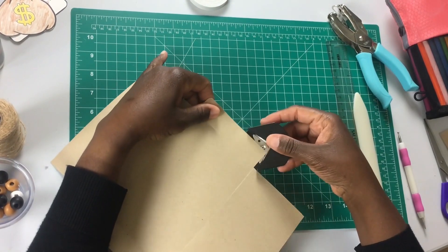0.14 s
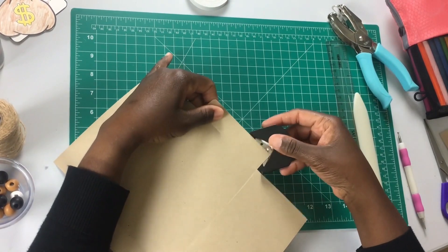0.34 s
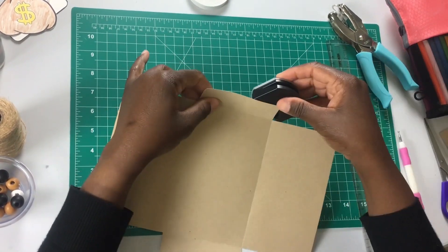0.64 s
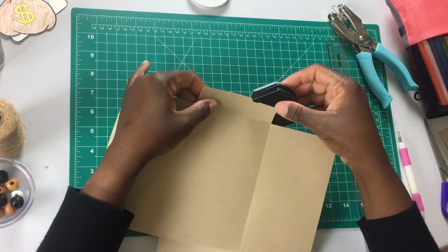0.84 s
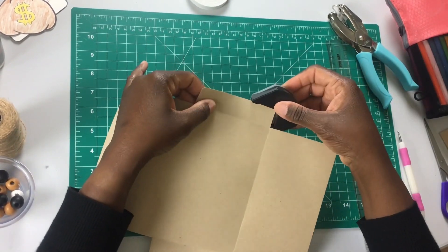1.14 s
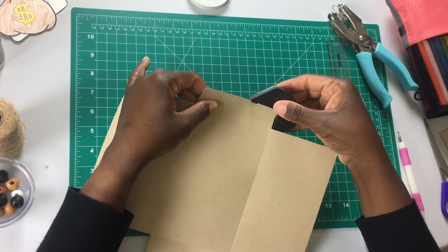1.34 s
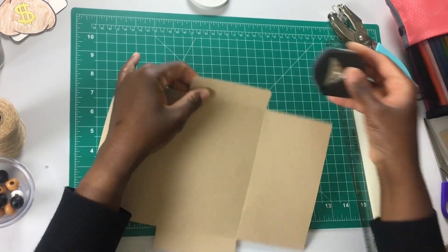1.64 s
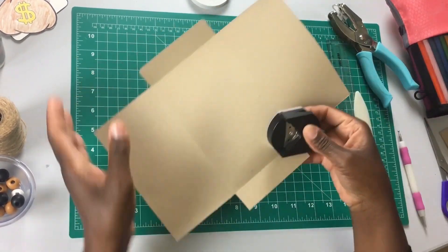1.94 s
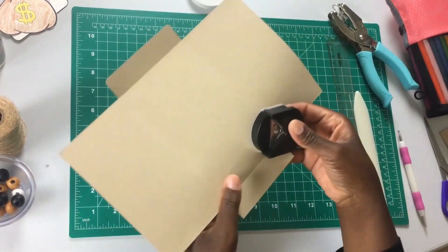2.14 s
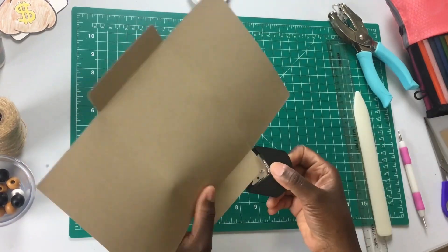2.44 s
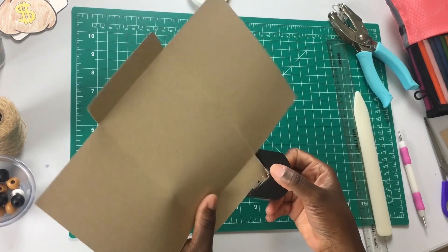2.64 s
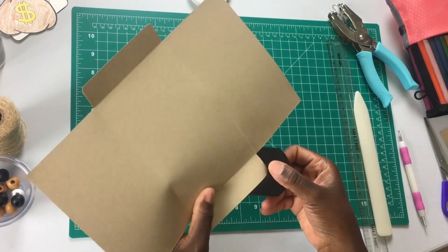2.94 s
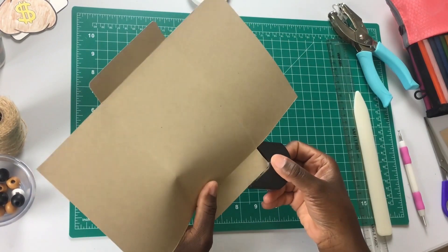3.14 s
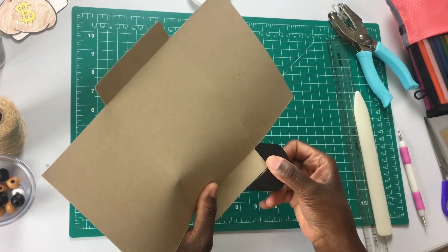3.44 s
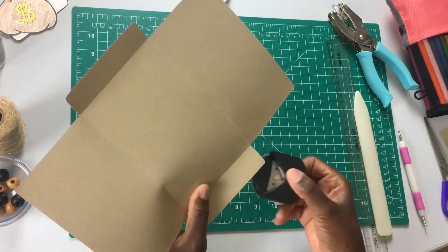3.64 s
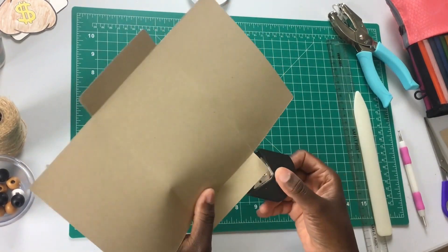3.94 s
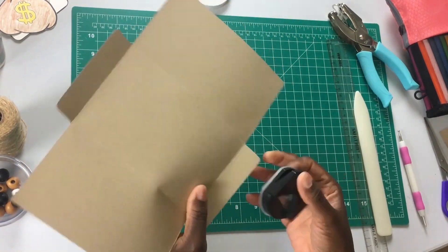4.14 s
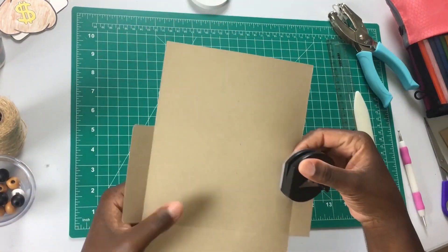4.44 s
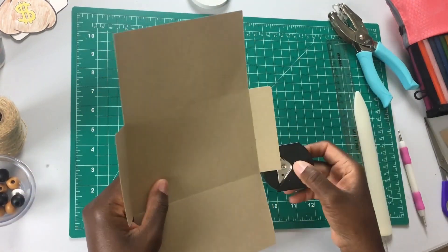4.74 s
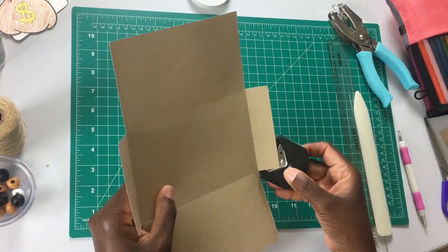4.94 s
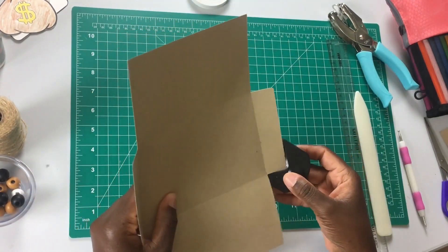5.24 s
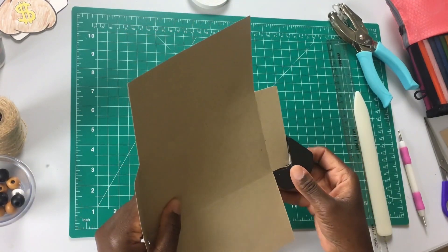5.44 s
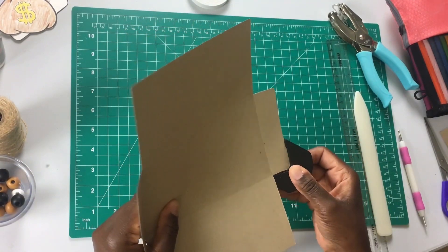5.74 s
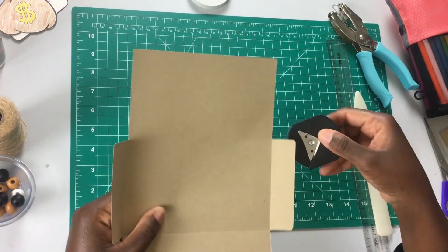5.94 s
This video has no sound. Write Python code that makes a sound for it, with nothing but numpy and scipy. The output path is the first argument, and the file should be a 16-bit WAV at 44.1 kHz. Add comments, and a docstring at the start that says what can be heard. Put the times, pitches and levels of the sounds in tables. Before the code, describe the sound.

A handheld corner punch crunches sharply through stiff card three times, with one weak tear, amid dry paper rustles and small knocks.

```python
"""Corner punch on a card folder

A handheld corner punch rounds three corners of a card folder over a cutting mat, close to a microphone. Each of
four cuts, the third weak, is a swell of tearing fibres, a crack and a short rattle of the housing; return
clicks follow the first, second and last. In between, filtered noise makes the card brush over mat and fingers,
and noise-driven modes make it knock and squeak, above a low room rumble and a thin hiss."""
import sys
import numpy as np
from scipy import signal
from scipy.fft import rfft, irfft, next_fast_len
from scipy.io import wavfile
from scipy.ndimage import uniform_filter1d

SR = 44100
rng = np.random.default_rng(int(sys.argv[2]) if len(sys.argv) > 2 else 0)


def generate_wav(sig):
    """Save sig (samples, or channels by samples) to the path in sys.argv[1] as 16-bit PCM at SR."""
    pcm = np.round(np.clip(np.atleast_2d(sig).T, -1, 1) * 32767).astype(np.int16)
    wavfile.write(sys.argv[1], SR, pcm)


N = 268108
TIME = np.arange(N) / SR
LOCAL = np.arange(-SR // 10, SR // 4) / SR  # event time in s, zero at the instant of the event


def undb(db):
    """Decibels to gain."""
    return 10 ** (np.asarray(db) / 20)


def level(x, db):
    """Set the rms of a steady sound."""
    return x * undb(db) / np.sqrt(np.mean(x ** 2))


def strength(x, db):
    """Set the energy of a blow, as the rms it would have if it lasted 10 ms."""
    return x * undb(db) / np.sqrt(np.sum(x ** 2) / (SR / 100))


def colour(x, points):
    """Causal minimum-phase filter with the given (Hz, dB) spectrum."""
    size = next_fast_len(len(x) + 2048, True) // 2 * 2
    hz, db = np.transpose(points)
    log_hz = np.log(np.fft.rfftfreq(size, 1 / SR) + 1)
    log_gain = np.log(undb(np.interp(log_hz, np.log(hz), db)))
    # folding the cepstrum onto positive time gives minimum phase
    cepstrum = irfft(log_gain)
    cepstrum[1:size // 2] *= 2
    cepstrum[size // 2 + 1:] = 0
    return irfft(rfft(x, size) * np.exp(rfft(cepstrum)))[:len(x)]


def fade(t, t60):
    """Exponential decay that starts at t = 0 and falls 60 dB in t60 seconds."""
    return (t >= 0) * np.exp(-np.log(1000) * np.abs(t) / t60)


def ring(x, hz, t60):
    """One damped mode driven by x."""
    pole = np.exp((2j * np.pi * hz - np.log(1000) / t60) / SR)
    return signal.lfilter([1], [1, -pole], x + 0j).imag


def fibres(size, spread_db):
    """Dense tiny slips and breaks of paper fibres; a larger spread makes a few much stronger."""
    burst_db = spread_db * np.minimum(rng.exponential(size=size), 5)
    return level(rng.standard_normal(size) * undb(burst_db), 0)


def walk(rate):
    """Slow random wandering with unit rms, rate steps per second."""
    hold = int(SR / rate)
    steps = np.repeat(rng.standard_normal(2000), hold)[:N]
    return level(uniform_filter1d(steps, hold), 0)


def add(out, s, sound):
    """Mix in an event whose local time zero falls at s."""
    index = np.round((s + LOCAL[0]) * SR).astype(int) + np.arange(len(sound))
    inside = (index >= 0) & (index < N)
    out[index[inside]] += sound[inside]


# Room rumble. Each row: frequency in Hz, gain in dB.
RUMBLE_SPECTRUM = [(15, -38), (28, -12), (45, -7.5), (63, 3.5), (90, -6), (132, -1), (180, -11.5),
                   (300, -14.5), (520, -23.5), (3000, -65.5)]
# Thin hiss. Each row: frequency in Hz, gain in dB.
AIR_SPECTRUM = [(200, -15), (500, -14), (1050, -9), (1500, -6), (2800, -6.5), (4900, -9.5), (7500, -8),
                (9500, -6.5), (16000, -5)]


def background():
    """Low wavering room rumble and a smooth thin hiss."""
    rumble = level(colour(rng.standard_normal(N), RUMBLE_SPECTRUM), -51.5)
    wavering = rumble * undb(2 * walk(rate=9.2))
    return wavering + level(colour(rng.standard_normal(N), AIR_SPECTRUM), -57.5)


FIDGET_SHEET_DB, FIDGET_HISS_DB, FIDGET_SWING_DB, FIDGET_PER_S = -62.5, -66, 2.5, 14


def fidget():
    """Between the moves the fingers keep rubbing the card faintly, with wandering friction power."""
    power = undb(FIDGET_SWING_DB * walk(rate=FIDGET_PER_S)) ** 2
    yield power, FIDGET_SHEET_DB, FIDGET_HISS_DB


def nudge(s):
    """Friction power of one short push of the card, centred on s."""
    half_width_s = 0.39 * 0.018
    return 1.56 / (1 + np.abs((TIME - s) / half_width_s) ** 3.14)


# Short pushes that line the card up.
# Each row: centre in seconds, relative sheet level in dB, relative hiss level in dB.
NUDGES = [(0.008, -39, -45.5), (0.205, -47, -56), (0.253, -47, -50), (0.402, -44, -49.5),
          (0.556, -51.5, -49), (0.586, -46.5, -48), (0.809, -52, -43.5), (0.969, -51.5, -48),
          (1.044, -51, -49), (1.428, -53.5, -56), (1.712, -54, -51.5), (2.234, -44, -36.5),
          (2.492, -48.5, -52), (2.695, -42.5, -43), (3.068, -49, -56), (4.124, -47, -44),
          (4.641, -52.5, -47), (4.927, -47.5, -51), (5.05, -43, -49), (5.191, -38.5, -46),
          (5.312, -50.5, -52), (5.42, -50, -52.5)]


def nudges():
    """Short pushes as (friction power, sheet dB, hiss dB)."""
    for s, sheet_db, hiss_db in NUDGES:
        yield nudge(s), sheet_db, hiss_db


def flexing(x, patchy_db):
    """A bending sheet radiates unevenly: the level of each band wanders on its own."""
    edges_hz = np.geomspace(1000, 16000, 13)
    total = 0
    for pair in zip(edges_hz, edges_hz[1:]):
        band = signal.sosfilt(signal.butter(2, pair, "band", fs=SR, output="sos"), x)
        total = total + band * undb(patchy_db * walk(rate=60))
    return total


LIFT_S = 1.9  # the folder is picked up off the mat
# Sheet lying on the mat. Each row: frequency in Hz, gain in dB.
SHEET_LYING_SPECTRUM = [(100, -5.5), (500, -6.5), (750, 0), (1400, -1), (1800, -9), (4000, -29)]
# Sheet held off the mat. Each row: frequency in Hz, gain in dB.
SHEET_LIFTED_SPECTRUM = [(60, 2.5), (150, 5.5), (300, -5), (500, -3), (720, 1), (1100, -3), (1600, -11.5),
                         (4000, -32)]
# Card sliding on mat and fingers. Each row: frequency in Hz, gain in dB.
RUB_SPECTRUM = [(600, -15.5), (1400, -2.5), (2700, 0.5), (3700, -1.5), (5000, -5.5), (7300, -8),
                (9500, -5.5), (12000, -10), (16000, -11)]


def rustling():
    """Each move of the card hisses at its edge and shakes the whole sheet; the friction comes unevenly."""
    sheet_power, hiss_power = 0, 0
    for power, sheet_db, hiss_db in moves():
        sheet_power = sheet_power + power * undb(sheet_db) ** 2
        hiss_power = hiss_power + power * undb(hiss_db) ** 2
    # the edge grips and lets go; now and then a single fibre catches and flicks free
    grip = undb(2.2 * walk(rate=200))
    flicks = level((rng.random(N) < 200 / SR) * rng.standard_normal(N), -5)
    sheet_friction = grip * fibres(N, spread_db=2.5) + flicks
    edge_friction = grip * fibres(N, spread_db=2.5) + flicks
    lifted = level(colour(sheet_friction, SHEET_LIFTED_SPECTRUM), 0)
    lying = level(colour(sheet_friction, SHEET_LYING_SPECTRUM), 0)
    sheet = np.where(TIME > LIFT_S, lifted, lying)
    hiss = level(colour(flexing(edge_friction, patchy_db=1.4), RUB_SPECTRUM), 0)
    return sheet * np.sqrt(sheet_power) + hiss * np.sqrt(hiss_power)


# Bending modes of the held card. Each row: multiple of the body pitch, relative level in dB.
CARD_MODES = [(0.619, -18.5), (0.901, 4), (1.08, 19.5), (1.35, -8), (1.779, 2.5)]
# Dull thud of the sheet. Each row: frequency in Hz, gain in dB.
THUD_SPECTRUM = [(30, -11.5), (150, -8), (400, -0.5), (750, 7.5), (1200, 1), (1800, 1.5), (4000, -56.5)]


def card(contact, hz):
    """The held sheet answers a blow with a dull thud and its bending modes."""
    bending = sum(strength(ring(contact, hz * ratio, t60=0.018), db) for ratio, db in CARD_MODES)
    return strength(bending, 0) + strength(colour(contact, THUD_SPECTRUM), -1.4)


KNOCK_CYCLES = 17.3  # t60 in periods of the pitch: a loosely held sheet sounds lower and chatters longer
# Tick of the plastic. Each row: frequency in Hz, gain in dB.
TICK_SPECTRUM = [(600, -18.5), (1500, -5), (1850, -4), (2600, 3), (3500, 0), (4900, -9), (5900, -2.5),
                 (7300, -13), (8900, -3), (10300, -10.5), (11800, -7.5), (16000, -12)]


def knock(body_db, hz, tick_db, rise):
    """The card edge scrapes in and meets a stop: the sheet thuds while the plastic ticks."""
    envelope = fade(-LOCAL, rise) + fade(LOCAL, KNOCK_CYCLES / hz)
    scrape = envelope * fibres(len(LOCAL), spread_db=5.0)
    stop = fade(LOCAL, t60=0.0045) * rng.standard_normal(len(LOCAL))
    contact = strength(scrape, 0) + strength(stop, -8.5)
    body = strength(card(contact, hz), body_db)
    tick = strength(colour(contact, TICK_SPECTRUM), tick_db)
    return body + tick


# Card and punch knocking together; the last row is the louder return click after the final cut. # Each row:
# contact in seconds, body level in dB, body pitch in Hz, tick level in dB, 60 dB rise in seconds.
KNOCKS = [(0.291, -43, 1040, -54.5, .007), (0.489, -36, 980, -44, 0.011), (0.777, -24.5, 875, -31, 0.029),
          (1.148, -38, 796, -35, .01), (1.191, -38.5, 760, -51, 0.0078), (1.921, -43.5, 440, -63, .006),
          (2.584, -44.5, 690, -51, .01), (2.66, -35, 566, -40.5, 0.013), (3.033, -33.5, 570, -38, 0.055),
          (3.644, -31.5, 563, -33, 0.018), (3.726, -37, 690, -49, 0.0073), (3.753, -40, 660, -42.5, 0.026),
          (4.087, -45, 990, -42, 0.028), (4.167, -28, 720, -34, 0.028), (4.277, -42, 535, -44, 0.018),
          (4.494, -34, 450, -37, 0.0018), (4.563, -48.5, 1280, -42.5, .004), (4.76, -51, 720, -46, 0.0083),
          (5.118, -43, 554, -46.5, .007), (5.236, -40, 667, -44.5, 0.032), (5.801, -33, 850, -40, .06)]


def knocks(out):
    """Add every knock of card on punch."""
    for s, *row in KNOCKS:
        add(out, s, knock(*row))


APPROACH_LEAD_S, APPROACH_REFERENCE_RISE_S = 0.0072, 0.024
APPROACH_SHEET_DB, APPROACH_HISS_DB = -12.5, -12  # relative to the tick


def approaches():
    """Rubbing just before a knock, the louder the longer the scrape and the harder the tick."""
    for s, _, _, tick_db, rise in KNOCKS:
        power = nudge(s - APPROACH_LEAD_S) * rise / APPROACH_REFERENCE_RISE_S
        yield power, tick_db + APPROACH_SHEET_DB, tick_db + APPROACH_HISS_DB


def slide(s, attack, hold, release):
    """Friction power of a long move: it gathers speed, holds and dies away (attack and release span 60 dB)."""
    rising = np.maximum(s - TIME, 0) / attack
    falling = np.maximum(TIME - s - hold, 0) / release
    return np.exp(-np.log(1000) * (rising + falling)) ** 2


# The folder is swung round or drawn through the slot.
# Each row: start of hold in seconds, attack, hold and release in seconds, sheet level in dB, hiss level in dB.
SLIDES = [(0.414, .09, 0.035, 0.53, -49, -42.5), (1.844, 0.15, 0.056, 0.14, -47, -42),
          (2.198, 0.4, 0.091, 0.29, -50.5, -45.5), (2.627, 0.092, .06, .1, -48.5, -54.5),
          (3.875, 0.23, .115, 0.1, -45, -50.5), (4.286, 0.045, 0.037, 0.052, -44, -41),
          (4.496, .25, 0.02, 0.36, -43.5, -42.5), (5.233, .03, .035, .1, -48.5, -47)]


def slides():
    """Long moves as (friction power, sheet dB, hiss dB)."""
    for s, attack, hold, release, sheet_db, hiss_db in SLIDES:
        yield slide(s, attack, hold, release), sheet_db, hiss_db


def moves():
    """Every move of the card as (friction power over time, sheet dB, hiss dB)."""
    for source in (fidget, nudges, approaches, slides):
        yield from source()


def squeak(hz, db):
    """A short run of stick and slip sets one resonance going."""
    slips = np.exp(-(LOCAL / 0.0073) ** 2) * fibres(len(LOCAL), spread_db=0.0)
    return strength(ring(slips, hz, t60=0.035), db)


# Card rubbing in the slot. Each row: centre in seconds, pitch in Hz, level in dB.
SQUEAKS = [(.777, 1490, -29.5), (1.143, 3230, -40), (1.143, 4310, -45.5), (4.563, 3280, -48),
           (4.84, 3250, -50)]


def squeaks(out):
    """Add every brief squeak."""
    for s, *row in SQUEAKS:
        add(out, s, squeak(*row))


# Steel die and plastic housing. Each row: frequency in Hz, relative level in dB, t60 in seconds.
PUNCH_MODES = [(1061, -2.5, 0.15), (1410, -8, 0.15), (1960, -8.5, .06), (2260, -14, .06), (3080, -26, .08),
               (3880, -28, .05), (4500, 8, 0.041), (6030, 5.5, 0.056), (8250, -6, .04), (9170, 2, 0.047),
               (10000, -6, 0.024), (11800, -17, 0.049)]


def housing(contact):
    """Die and housing ring together."""
    return sum(strength(ring(contact, hz, t60), db) for hz, db, t60 in PUNCH_MODES)


# Tear, crack and rattle. Each row: frequency in Hz, gain in dB.
TEAR_SPECTRUM = [(40, -35), (250, -21), (500, -10.5), (1050, 0.5), (1550, -1.5), (2500, 1.5), (4500, -1),
                 (7000, -2), (10000, 1.5), (13000, -1), (16000, -6.5)]


def cut(tear_db, crack_db, rattle_db, thud_db, card_hz, ring_hz, ring_db, length):
    """Fibres tear ever harder under the die, it breaks through and the housing rattles and rings."""
    size = len(LOCAL)
    load = (LOCAL < 0) * np.clip(1 + LOCAL / length, 0, 1) ** 1.84
    tear = strength(colour(load * fibres(size, spread_db=1.5), TEAR_SPECTRUM), tear_db)
    snap = fade(LOCAL + 0.0006, t60=0.012) * rng.standard_normal(size)
    crack = strength(colour(snap, TEAR_SPECTRUM), crack_db)
    chatter = colour(fade(LOCAL, t60=0.068) * fibres(size, spread_db=0.5), TEAR_SPECTRUM)
    # plastic parts chatter more dully than paper tears
    dull = signal.sosfilt(signal.butter(1, 7000, fs=SR, output="sos"), chatter)
    rattle = strength(dull, rattle_db)
    blow = tear + crack + rattle
    modes = strength(housing(tear + crack), rattle_db - 7)
    # the grip decides which resonance is left free to ring
    free = strength(ring(blow, ring_hz, t60=0.022), ring_db)
    thud = strength(card(blow, card_hz), thud_db)
    return blow + modes + free + thud


# Cuts, the third a weak tear as the corner is tugged free.
# Each row: break-through in seconds, levels of tear, crack, rattle and card thud in dB, card pitch in Hz,
# free ring in Hz, free ring level in dB, tearing length in seconds.
CUTS = [(1.545, -13, -16.5, -18.5, -26.5, 420, 4680, -26, 0.023),
        (3.4577, -19.5, -15, -16.5, -60, 710, 4260, -23, 0.021),
        (4.154, -26, -34.5, -35, -25.5, 650, 734, -35, 0.021),
        (5.7398, -17, -13.5, -14.5, -25.5, 640, 2500, -21.5, 0.021)]


def cuts(out):
    """Add every cut."""
    for s, *row in CUTS:
        add(out, s, cut(*row))


RETURN_BODY_DB, RETURN_HZ, RETURN_TICK_DB, RETURN_RISE_S = -48.5, 1070, -42, 0.037
# Faint return clicks after the first two cuts; the click after the last cut is among the knocks. Each entry:
# contact in seconds.
RETURNS = [1.62, 3.525]


def returns(out):
    """The spring pushes the die back after a clean cut: a faint knock."""
    for s in RETURNS:
        add(out, s, knock(RETURN_BODY_DB, RETURN_HZ, RETURN_TICK_DB, RETURN_RISE_S))


def room(x):
    """A small damped room adds a faint tail of decaying noise, 8 ms late."""
    t = LOCAL[LOCAL >= 0]
    decay = rng.standard_normal(len(t)) * fade(t - 0.008, t60=0.18)
    tail = colour(decay, [(200, -3), (2500, 0.0), (12000, -8.0)])
    unit_tail = tail / np.sqrt(np.sum(tail ** 2))
    return x + undb(-24.5) * signal.fftconvolve(x, unit_tail)[:N]


def scene():
    """Rustles, knocks, squeaks, cuts and return clicks in the room, over the background."""
    craft = rustling()
    for add_sounds in (knocks, squeaks, cuts, returns):
        add_sounds(craft)
    return (room(craft) + background())[None]


TOP_HZ = 15750


def record(dry):
    """The microphone softens the highest treble, the loudest peaks overload it and the top is cut."""
    soft = signal.sosfilt(signal.butter(3, 14200, fs=SR, output="sos"), dry)
    clipped = np.clip(soft, -0.9, 0.9)
    return signal.sosfilt(signal.ellip(8, 0.2, 70, TOP_HZ, fs=SR, output="sos"), clipped)


dry = scene()
out = record(dry)
generate_wav(out)
```